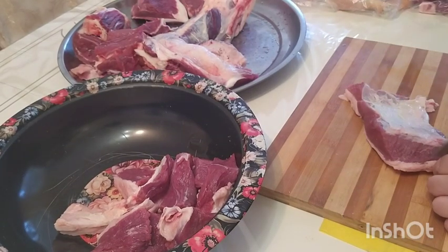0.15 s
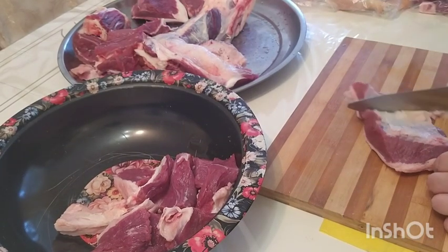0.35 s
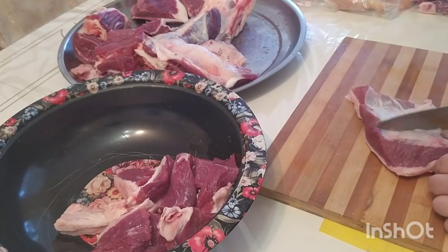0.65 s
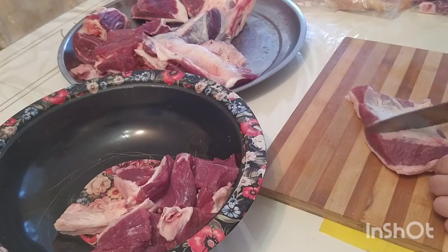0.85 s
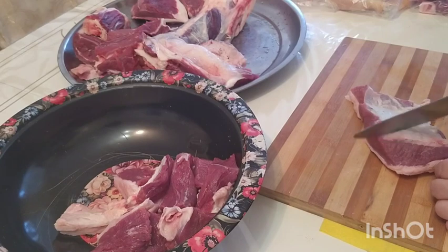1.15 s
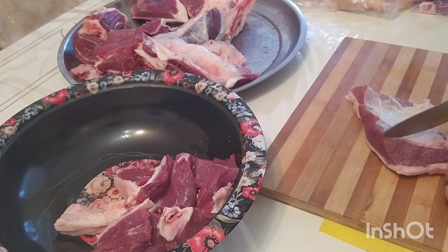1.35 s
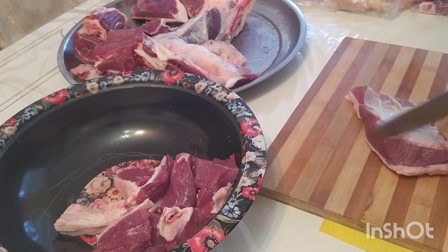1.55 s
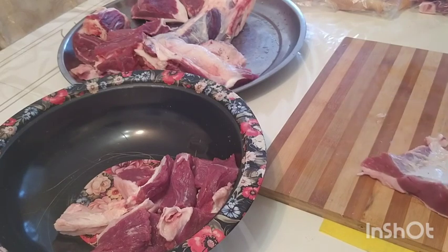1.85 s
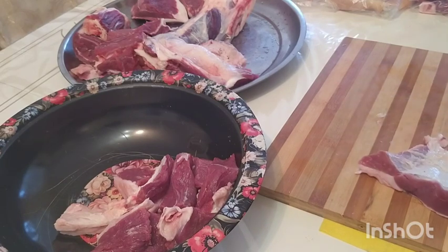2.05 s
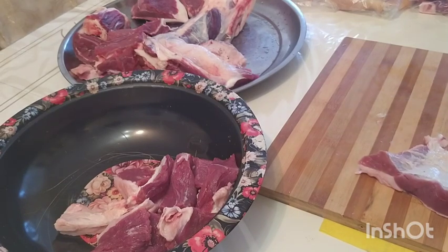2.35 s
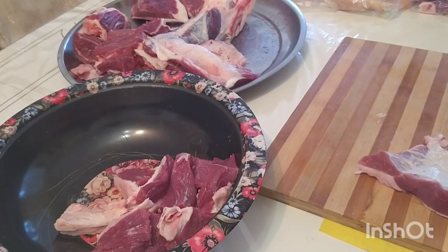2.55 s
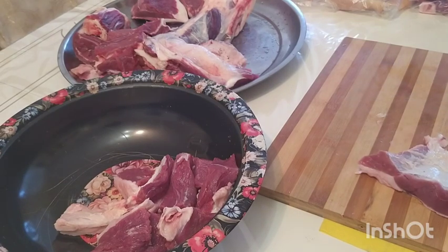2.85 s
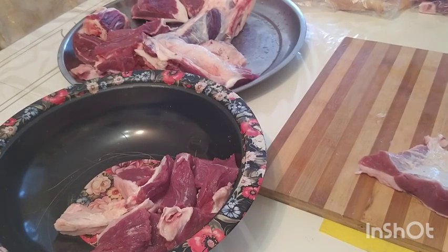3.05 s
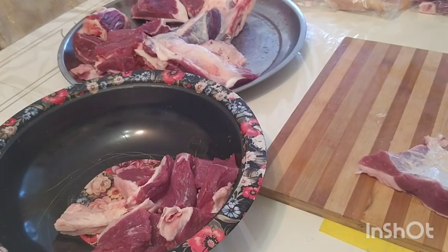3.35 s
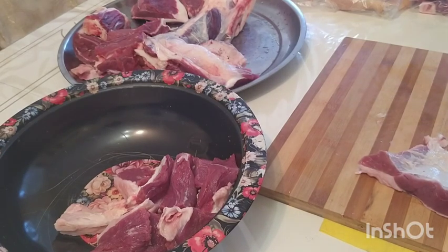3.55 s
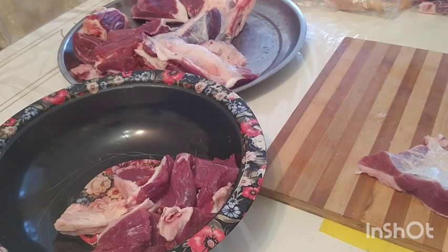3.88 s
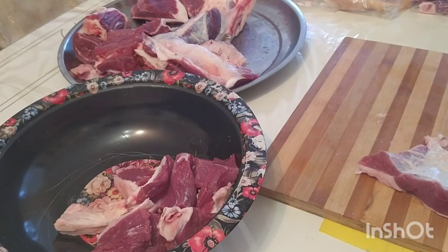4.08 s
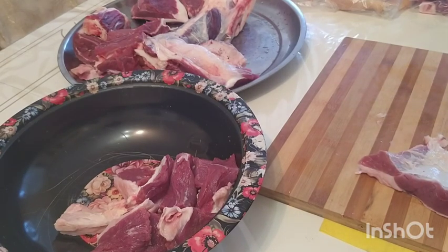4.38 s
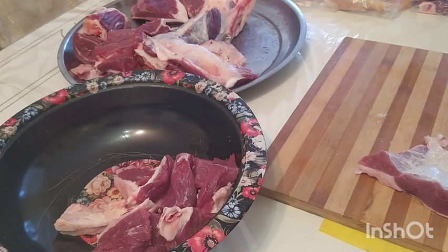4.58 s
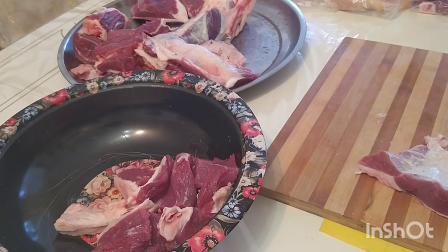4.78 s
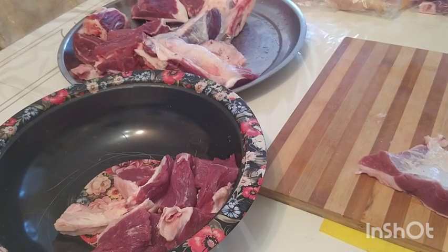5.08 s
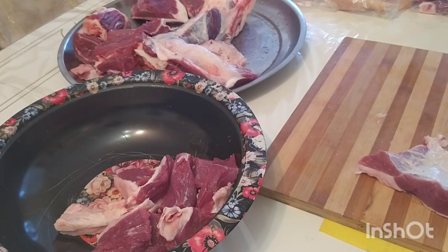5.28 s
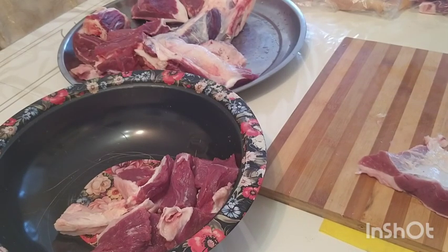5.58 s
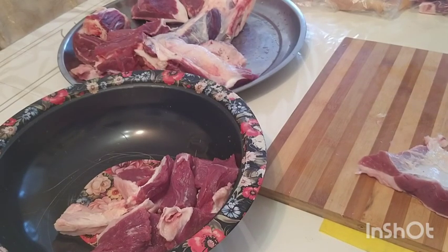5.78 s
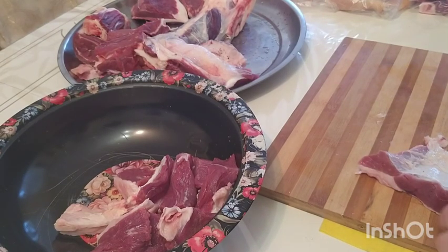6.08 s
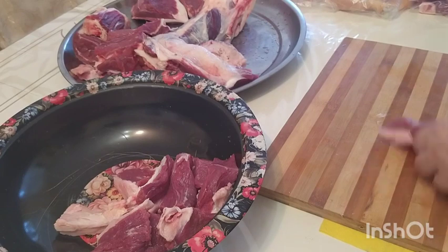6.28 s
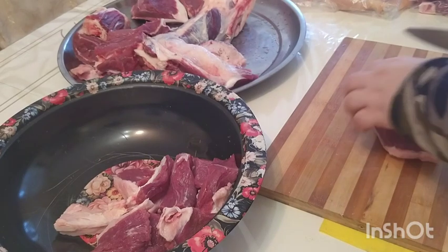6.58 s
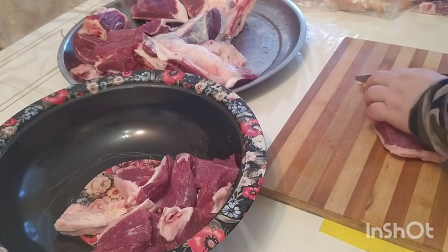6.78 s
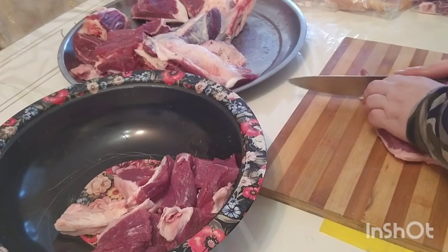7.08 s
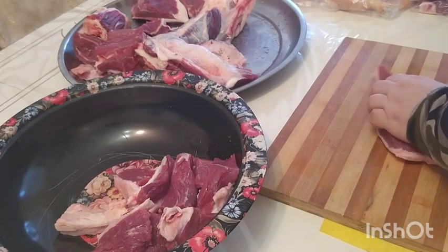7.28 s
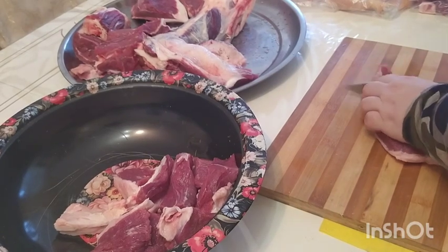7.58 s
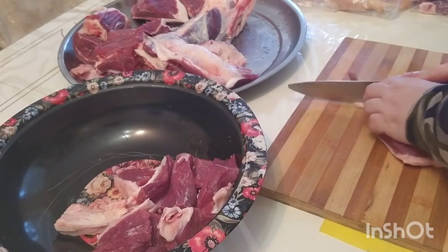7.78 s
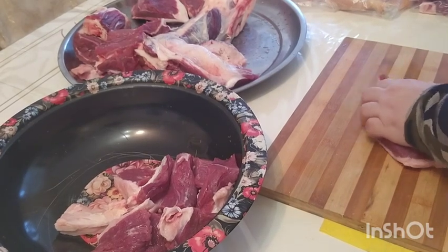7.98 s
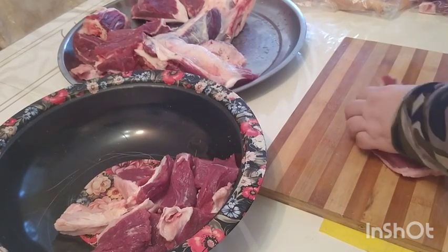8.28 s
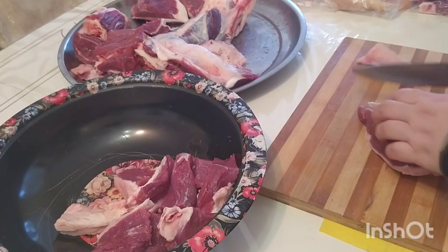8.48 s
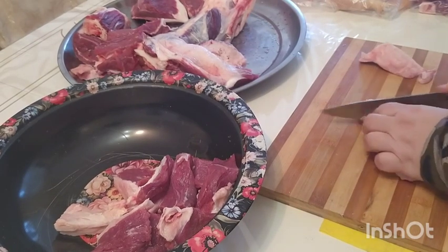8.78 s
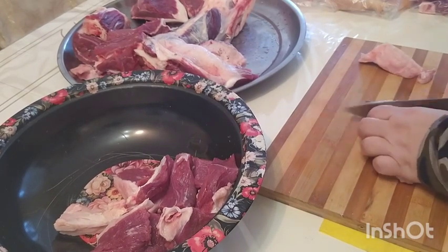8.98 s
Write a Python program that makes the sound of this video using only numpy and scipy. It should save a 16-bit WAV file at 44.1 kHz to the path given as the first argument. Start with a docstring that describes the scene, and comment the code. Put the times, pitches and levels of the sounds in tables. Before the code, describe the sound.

Quiet, wet knife strokes and dull knocks on a cutting board, broken once by a steel blade clattering on the counter.

```python
"""A kitchen knife slices raw meat on a wooden board in a small hard-walled kitchen.
Friction drives each stroke: wet fibres hiss and tear, the edge rasps, the board groans, the table thuds.
Fibres snap off the blade; meat and hand land on the board. Once the steel blade clatters hard on the
counter and the room rings after it. Room air and stand rumble lie beneath, at a two-port microphone."""
import sys
import numpy as np
from scipy import signal
from scipy.fft import rfft, irfft, next_fast_len
from scipy.io import wavfile
from scipy.ndimage import uniform_filter1d, map_coordinates

SR = 44100
rng = np.random.default_rng(int(sys.argv[2]) if len(sys.argv) > 2 else 0)


def wav_out(sig):
    """Save sig, one row per channel (or a flat mono array), as 16-bit PCM at SR to the path in sys.argv[1]."""
    wavfile.write(sys.argv[1], SR, np.round(np.clip(np.atleast_2d(sig).T, -1, 1) * 32767).astype(np.int16))


N = 403074

# Cuts and handling of the meat. Each row: full-strength time in seconds, rise in dB/s, hold in seconds,
# then levels in dB of wet hiss, fibre tear, edge rasp, board body and table.
KNIFE_STROKES = [(0.115, 720.0, 0, -51, -62.5, -75, -70, -71.5),
                 (0.382, 333, 0.009, -66, -79, -69.5, -55.5, -58.5),
                 (0.455, 612, 0.051, -62.5, -70, -78, -95.0, -79),
                 (0.729, 180.0, 0.011, -63.0, -69.5, -78, -76.5, -75.5),
                 (0.974, 380.0, 0.037, -69, -77, -85.5, -95.0, -76.0),
                 (1.049, 440.0, 0.0056, -71, -73, -75.0, -74, -73),
                 (1.154, 200.0, 0.089, -53.5, -64.5, -65.0, -77, -80),
                 (1.445, 210.0, 0.01, -59, -67, -65, -67.5, -67),
                 (1.575, 480.0, 0.025, -56.5, -63.5, -58.5, -63, -81),
                 (1.794, 220.0, 0.018, -52.5, -56, -59.0, -63.5, -66.5),
                 (1.94, 245, 0.021, -72, -76, -87, -64.5, -63),
                 (2.004, 380.0, 0.034, -55.5, -66, -59, -63.5, -64.5),
                 (2.101, 62, 0.11, -63.5, -72, -69.5, -70.5, -83),
                 (2.37, 140.0, 0.002, -68.5, -77.0, -79.0, -78, -79),
                 (2.566, 82, 0.036, -63.0, -69, -66, -66.5, -73),
                 (2.665, 1200.0, 0.025, -65.5, -70.5, -70, -59.0, -59),
                 (2.768, 220.0, 0.03, -57, -61, -56.5, -58, -57.5),
                 (2.864, 60.0, 0.071, -61.5, -71, -71.5, -80, -76),
                 (3.107, 440.0, 0, -56.5, -63.5, -70, -90, -95.0),
                 (3.23, 61, 0.022, -67.5, -82, -84, -73.5, -64.0),
                 (3.304, 1040.0, 0.036, -65, -70, -59.0, -67, -69),
                 (3.571, 60.0, 0.087, -58, -67.5, -61.0, -65, -66.5),
                 (3.781, 360.0, 0.02, -47, -56.0, -64, -65, -59),
                 (3.871, 57, 0.122, -68, -71, -66.5, -69, -91),
                 (3.894, 162, 0.004, -54, -73, -66.0, -93.0, -67),
                 (4.069, 242, 0.049, -53, -70.5, -67, -63.5, -63),
                 (4.248, 180.0, 0.018, -50, -58, -49, -53.5, -59),
                 (4.301, 55, 0.12, -52.5, -67.5, -64.5, -71, -64),
                 (4.559, 64.5, 0.0, -65, -71, -66.5, -67, -77.5),
                 (4.626, 240.0, 0.156, -61.0, -73.5, -70.5, -66, -73),
                 (4.805, 450.0, 0.013, -45.5, -61, -60.5, -67, -58),
                 (4.867, 680.0, 0.0027, -49, -65, -57, -71, -72),
                 (4.969, 430.0, 0.022, -53.5, -67, -60.5, -51, -44.5),
                 (5.051, 570.0, 0.0092, -87.5, -72.5, -71, -46, -74.5),
                 (5.088, 123.5, 0.038, -54, -75, -71.5, -93, -58),
                 (5.29, 70.0, 0.1, -99, -75.5, -78, -57.5, -63),
                 (5.355, 91, 0.061, -59.0, -69, -61.5, -67, -73.5),
                 (5.663, 891.5, 0.034, -67, -71.5, -65, -60.5, -64.5),
                 (5.77, 59, 0.11, -68, -74, -69, -64.5, -64),
                 (5.904, 362, 0.062, -59.5, -62, -59.5, -62.5, -65.5),
                 (6.154, 859.5, 0.034, -46.0, -52, -52.5, -45, -53.5),
                 (6.372, 60.0, 0.03, -56, -65.5, -64.5, -71.5, -76),
                 (6.552, 649.5, 0.023, -49, -53.5, -51.0, -51.5, -51),
                 (6.802, 442, 0.028, -56, -63, -61.5, -62.5, -73),
                 (6.982, 249.5, 0.06, -62, -73, -75.5, -87.0, -72),
                 (7.053, 293, 0.027, -57.5, -63.5, -59.5, -56, -55),
                 (7.183, 653, 0.041, -59.5, -65, -61.5, -66, -71),
                 (7.26, 541, 0.0039, -60.5, -59.5, -62.5, -57.0, -56),
                 (7.403, 349, 0.044, -51.5, -55.5, -55, -49.5, -55),
                 (7.587, 280.0, 0.05, -55.5, -60.5, -61.5, -54.5, -60),
                 (7.625, 2450.0, 0.033, -64, -92.5, -95, -65, -74.0),
                 (7.777, 290.0, 0.0055, -49, -52.5, -55.5, -46, -53),
                 (7.918, 1418, 0.0, -44, -68, -54.5, -50, -65),
                 (7.948, 340.0, 0.031, -57, -54.0, -52.5, -46.5, -62.0),
                 (8.112, 228, 0.044, -45.5, -49.5, -43.5, -38.0, -53),
                 (8.284, 290.0, 0.025, -49.5, -48.5, -45.5, -36, -61),
                 (8.45, 170.0, 0.0028, -62, -77, -71.5, -88.5, -71),
                 (8.886, 191, 0.034, -52.5, -62.5, -60.5, -59, -61.5),
                 (9.036, 270.0, 0.018, -52, -60, -58.0, -56, -57.5)]
# Friction spectra. Each row: frequency in Hz, relative density in dB.
WET_HISS_DB = [(4800, -27.5), (5600, -6.5), (7000, 2), (8500, 1.5), (10500, -0.5), (11500, -7.5),
               (13000, -18), (15000, -28), (15900, -40.5)]
FIBRE_TEAR_DB = [(3000, -31.5), (3500, -6), (4200, -1.5), (5600, -2.5), (6400, -30.5)]
EDGE_RASP_DB = [(1600, -20), (1900, 2.5), (2700, 4.5), (3500, -7.5), (4000, -54)]
BOARD_SKIN_DB = [(700, -29.5), (900, -4), (1300, 1.5), (1900, -6), (2400, -39)]
BOARD_GROAN_DB = [(220, -36.5), (300, -3.5), (400, 0), (550, 1), (900, 1.5), (1150, -44.5)]
TABLE_THUD_DB = [(35, -18), (60, -2.5), (150, -2), (300, 0), (400, -41.5)]
# Board resonances. Each row: frequency in Hz, width in Hz, gain in dB.
BOARD_MODES = [(483, 90, -9), (620, 76, -14), (960, 79, -8.5), (1056, 65, 0), (1170, 50, -1),
               (1654, 74, -0.5), (2120, 41, -9), (2420, 60, -12), (3000, 140, -7.5), (4200, 550, -9.5)]
# Sticky snaps. Each row: start in seconds, level in dB, pitch in Hz, left minus right in dB.
FIBRE_SNAPS = [(0.3215, -57, 10100, -9), (0.3869, -51, 8100, -6), (0.466, -58, 5230, 0.5),
               (0.51, -59, 4995, 0.5), (0.6891, -51, 7900, -8), (0.722, -57, 5206, -1.5),
               (0.9792, -55, 10540, 6), (0.997, -58, 10480, 4), (1.7245, -59, 5540, -1.5),
               (2.0014, -50, 9060, 1.5), (3.0969, -62, 8900, -2), (4.059, -42, 8660, 1),
               (4.803, -41, 9390, 11.5), (5.27, -55, 6800, 1.5), (5.8975, -52.5, 3830, -1.5),
               (6.5211, -56, 8170, 2.5), (6.5301, -49, 8830, 2.5), (6.797, -48.5, 9900, 4),
               (7.539, -41, 7840, 0), (7.58, -48, 10500, 0.5), (7.6289, -49, 7000, 2),
               (7.664, -53, 6360, -3), (7.7218, -49, 7950, -4), (7.7782, -44, 4620, 2),
               (7.8655, -50, 6890, -2.0), (7.8885, -50, 7535, -2), (7.9159, -37.5, 7780, -6.5),
               (8.0541, -49, 4430, -3), (8.4713, -63, 7650, -3)]
# Meat and hand landing, and at 3.304 s the blade's first touch on the counter before it clatters. # Each row:
# start in seconds, level in dB, pitch in Hz, T60 in seconds, board drive in dB above that level.
LANDINGS = [(2.662, -45.5, 179, 0.068, 38), (3.304, -61, 646, 0.054, 26), (4.242, -51, 428, 0.09, 33),
            (4.965, -30.5, 159.5, 0.077, 21.5), (5.654, -42, 362, 0.072, 17), (5.894, -46, 811, 0.061, 38),
            (6.143, -33, 690, 0.074, 37), (6.541, -39, 607, 0.054, 30), (6.561, -35, 133, 0.081, 23),
            (7.047, -43, 141, 0.19, 33.5), (7.395, -33.5, 301, 0.064, 36.5), (7.768, -34, 552, 0.055, 26),
            (7.922, -34, 373, 0.077, 43), (8.273, -27.5, 600, 0.094, 28)]
# Blade rattle envelope. Each row: time in seconds, relative level in dB.
RATTLE_ENVELOPE_DB = [(3.338, -36.5), (3.343, -18), (3.351, -11.5), (3.361, -21.5), (3.375, -18.5),
                      (3.386, -23), (3.400, -29), (3.43, -38.5), (3.46, -70.5)]
# Blade rattle spectrum. Each row: frequency in Hz, relative density in dB.
RATTLE_SPECTRUM_DB = [(60, -35), (350, -21), (690, -21.5), (860, -8), (1300, -5.5), (1550, -8.5),
                      (2300, -2.5), (3400, -11.5), (5500, -7.5), (9200, -9), (12300, -22.5), (13500, -41),
                      (15700, -45)]
# Steel resonances. Each row: frequency in Hz, relative level in dB, T60 in seconds.
BLADE_MODES = [(857, -9, 0.36), (1230, -7.5, 0.44), (1289, -12, 0.17), (2256, -6, 0.44), (2265, -9.5, 0.38),
               (2640, -7.5, 0.44), (2666, -4.5, 0.2), (3880, -10, 0.3), (4780, -12.5, 0.44),
               (5680, -5, 0.38), (6710, -10, 0.25), (6654, -10.5, 0.23), (8520, -7.5, 0.32),
               (9130, -5.5, 0.28)]
# Wall reverberation. Each row: frequency in Hz, T60 in seconds.
ROOM_T60_S = [(100, 0.36), (400, 0.42), (2000, 0.33), (6000, 0.33), (12000, 0.21)]
# Background spectra. Each row: frequency in Hz, relative density in dB.
ROOM_AIR_DB = [(35, -31.5), (60, 8), (103, -2.5), (415, 0), (477, -5.5), (742, -8), (1840, -15),
               (2550, -12), (3620, -19), (8570, -17), (10600, -19), (14600, -51.5), (15700, -48)]
STAND_RUMBLE_DB = [(5, -8), (15, 12.5), (35, -4.5), (60, -13.5), (100, -39)]
# Likeness of the ports. Each row: frequency in Hz, coherence from 0 to 1.
PORT_COHERENCE = [(25, 0.17), (60, 0.48), (150, .9), (300, 0.55), (700, 0.34), (2000, 0.34), (6000, 0.15),
                  (15000, 0.068)]
# Stereo balance. Each row: frequency in Hz, left minus right in dB.
SCENE_PAN_DB = [(60, -1.5), (150, -0.5), (380, -1.5), (950, -1), (2380, 0), (5980, -4), (15000, 7.5)]
RATTLE_PAN_DB = [(60, -6), (150, -1.5), (380, 4.5), (950, -3.5), (2380, 2), (5980, -6), (15000, 18)]

BRIGHT_FADE_DB_PER_S, DEEP_FADE_DB_PER_S = 175.5, 162
SKIN_RASP_SHARE, SKIN_OFFSET_DB = 0.65, -1.28
HARD_STROKE_DB, SKIN_BOOST_DB_PER_DB = -49, 0.61
SNAP_T60_S = .016
LEFT_LAG_S, TOP_HZ = .00023, 15750


def slicing():
    """One friction noise shakes fibres, edge, board and table, each with its own grain."""
    n_fft = next_fast_len(N)
    hz = np.fft.rfftfreq(n_fft, 1 / SR)
    friction = rfft(mottled_noise(np.ones_like, patchy_db=3.0), n_fft)
    wood = 0.77 + np.abs(resonances(BOARD_MODES, hz))
    # Each row: spectrum, resonant gain, grain depth in dB, grains per second.
    layers = [(WET_HISS_DB, 1, 1.7, 160), (FIBRE_TEAR_DB, wood, 1.8, 130),
              (EDGE_RASP_DB, wood, 1.6, 110), (BOARD_SKIN_DB, wood, 2.1, 80),
              (BOARD_GROAN_DB, wood, 2.2, 60), (TABLE_THUD_DB, 1, 2.5, 25)]
    out = 0
    for envelope, (spectrum_db, peaks, grain_db, grains_per_s) in zip(stroke_envelopes(), layers):
        shaken = irfft(friction * amp(curve(spectrum_db, hz)) * peaks, n_fft)[:, :N]
        grain = amp(grain_db * wobble(grains_per_s))
        out += envelope * unit_rms(shaken * grain)
    return out


def stroke_envelopes():
    """Gain per friction layer: strokes rise, hold and fade; overlaps add in power."""
    full_s, rise_db_per_s, hold_s, hiss_db, tear_db, rasp_db, board_db, table_db = (
        np.transpose(KNIFE_STROKES))
    # The board's skin lies between rasp and body; hard strokes boost it.
    skin_db = SKIN_RASP_SHARE * rasp_db + (1 - SKIN_RASP_SHARE) * board_db + SKIN_OFFSET_DB
    skin_db += SKIN_BOOST_DB_PER_DB * np.maximum(board_db - HARD_STROKE_DB, 0)
    t = np.arange(0, N / SR, .002)[:, None]
    attack_db = -rise_db_per_s * np.maximum(full_s - t, 0)
    fading_s = np.maximum(t - full_s - hold_s, 0)
    bright = amp(attack_db - BRIGHT_FADE_DB_PER_S * fading_s) ** 2
    deep = amp(attack_db - DEEP_FADE_DB_PER_S * fading_s) ** 2
    powers = [bright @ amp(db) ** 2 for db in (hiss_db, tear_db, rasp_db)]
    powers += [deep @ amp(db) ** 2 for db in (skin_db, board_db, table_db)]
    return [np.interp(np.arange(N) / SR, t[:, 0], np.sqrt(power)) for power in powers]


def fibre_snaps():
    """Fibres snap off the blade: short tones, widened in pitch by uneven tearing."""
    out, t = np.zeros((2, N + SR)), np.arange(SR // 16) / SR
    for start_s, db, hz, pan_db in FIBRE_SNAPS:
        flutter = 1.2 + 2.4 * uniform_filter1d(rng.standard_normal(len(t)), size=6)
        snap = flutter * np.sin(2 * np.pi * hz * t) * decay(t, SNAP_T60_S, attack_s=0.00034)
        out[:, round(start_s * SR):][:, :len(t)] += amp(db + np.array([[.5], [-.5]]) * pan_db) * snap
    return out[:, :N]


def soft_landings():
    """Meat and hand land, and the blade first touches the counter: a damped push of the table plus a short ring
    of the board."""
    push, blows, t = np.zeros(N + SR), np.zeros(N), np.arange(SR // 5) / SR
    for start_s, db, hz, t60_s, drive_db in LANDINGS:
        start = round(start_s * SR)
        push[start:][:len(t)] += amp(db) * np.sin(2 * np.pi * hz * t) * decay(t, t60_s, attack_s=0.0061)
        blows[start] = amp(db + drive_db)
    ring = filtered(blows, lambda hz: resonances(BOARD_MODES, hz) / (1 + 1j * hz / 900) ** 2)
    return push[:N] + ring


def blade_clatter():
    """Steel hits the counter: a dense rattle starts the blade ringing; the walls prolong the rattle."""
    time_s, db = np.transpose(RATTLE_ENVELOPE_DB)
    envelope = amp(np.interp(np.arange(N) / SR, time_s, db, left=-150, right=-150))
    burst = envelope * rng.standard_normal((2, N))
    rattle = filtered(burst, lambda hz: amp(12.5 + curve(RATTLE_SPECTRUM_DB, hz)))
    direct = at_ports(rattle, lambda hz: pan_gains(RATTLE_PAN_DB, hz))
    return blade_ring(time_s[0]) + direct + amp(1.5) * wall_reverb(rattle, RATTLE_PAN_DB)


def blade_ring(start_s):
    """The loose blade's modes swell, waver and die, damped by the counter as it settles flat."""
    out, t = np.zeros((2, N + SR)), np.arange(SR // 2) / SR
    hz, db, t60_s = np.transpose(BLADE_MODES)[..., None]
    envelope = amp(db - 13.5) * decay(t, t60_s, attack_s=0.0087)
    settle = 1 / (1 + (t / .24) ** 8)
    drift_rad = .028 * np.cumsum(rng.standard_normal((len(hz), len(t))), axis=1)
    for port, lag_rad in zip(out, (0, np.pi / 2)):  # the flexing blade faces each port differently
        waver_hz = rng.uniform(7.7, 40, hz.shape)
        waver_db = 2.9 * np.sin(2 * np.pi * (waver_hz * t + rng.random(hz.shape)))
        partials = envelope * amp(waver_db) * np.sin(2 * np.pi * hz * t + drift_rad - lag_rad)
        port[round(start_s * SR):][:len(t)] = settle * partials.sum(axis=0)
    return out[:, :N]


def wall_reverb(x, pan_db):
    """Hard walls return a noise tail; each frequency dies at its own rate."""
    hz, t, cells = signal.stft(rng.standard_normal((2, SR * 3 // 5)), SR, nperseg=256)
    fade = amp(-60 * t / curve(ROOM_T60_S, hz)[:, None])
    tail = signal.istft(cells * fade, SR, nperseg=256)[1]
    wet = signal.oaconvolve(x, tail / np.linalg.norm(tail[0]), axes=1)[:, :N]
    return at_ports(wet, lambda hz: pan_gains(pan_db, hz))


def room_tone():
    """Steady room air and a slow rumble through the microphone stand."""
    air = unit_rms(mottled_noise(lambda hz: amp(curve(ROOM_AIR_DB, hz)), patchy_db=1.5))
    rumble = unit_rms(at_ports(rng.standard_normal((2, N)), lambda hz: amp(curve(STAND_RUMBLE_DB, hz))))
    return amp(-69 + 1.1 * wobble(2.4)) * air + amp(-63 + 3.6 * wobble(3.2)) * rumble


def mottled_noise(response, patchy_db):
    """Stereo noise whose level varies in small patches of frequency and time."""
    shape = (513, N // 512 + 3)
    cells = rng.standard_normal((2, *shape)) + 1j * rng.standard_normal((2, *shape))
    patches = uniform_filter1d(rng.standard_normal(shape), size=3, axis=0)
    patches = unit_rms(uniform_filter1d(patches, size=4, axis=1))
    pair = signal.istft(cells * amp(patchy_db * patches), window="cosine", nperseg=1024)[1][:, :N]
    return at_ports(pair, lambda hz: response(hz) * pan_gains(SCENE_PAN_DB, hz))


def at_ports(pair, response):
    """Two unrelated signals become left and right: alike in the bass, the left slightly late."""
    n_fft = next_fast_len(N + SR // 8)
    hz = np.fft.rfftfreq(n_fft, 1 / SR)
    spread_rad = np.arccos(curve(PORT_COHERENCE, hz)) / 2
    mid, side = rfft(pair, n_fft) * [np.cos(spread_rad), np.sin(spread_rad)]
    delay = np.exp(-2j * np.pi * LEFT_LAG_S * hz)
    return irfft([(mid + side) * delay, mid - side] * response(hz), n_fft)[:, :N]


def pan_gains(pan_db, hz):
    """Left and right gains from a balance table."""
    return amp(np.outer([.5, -.5], curve(pan_db, hz)))


def resonances(modes, hz):
    """Causal response of summed resonances, alternating in sign."""
    return sum((-1) ** k * amp(db) * 1j * hz * width_hz / (mode_hz ** 2 - hz ** 2 + 1j * hz * width_hz)
               for k, (mode_hz, width_hz, db) in enumerate(modes))


def filtered(x, response):
    """Apply a complex frequency response."""
    n_fft = next_fast_len(N + SR // 8)
    hz = np.fft.rfftfreq(n_fft, 1 / SR)
    return irfft(rfft(x, n_fft) * response(hz), n_fft)[..., :N]


def decay(t, t60_s, attack_s):
    """Exponential fade with a rounded onset."""
    return amp(-60 * t / t60_s) * (1 - np.exp(-t / attack_s))


def wobble(knots_per_s):
    """Smooth random curve."""
    knots = rng.standard_normal(int(N * knots_per_s / SR) + 4)
    return map_coordinates(knots, [np.arange(N) * knots_per_s / SR])


def curve(points, hz):
    """Interpolate (Hz, value) points on a log frequency axis."""
    point_hz, values = np.transpose(points)
    return np.interp(np.log(hz + 1), np.log(point_hz + 1), values)


def amp(db):
    """Decibels to gain."""
    return 10 ** (np.asarray(db) / 20)


def unit_rms(x):
    """Scale to RMS 1."""
    return x / np.sqrt(np.mean(x ** 2) + 1e-20)


def scene():
    """All sources in stereo; snaps and landings share one wall reverb."""
    snaps, landings = fibre_snaps(), soft_landings()
    send = amp(-6.5) * snaps + amp(-4) * landings
    return slicing() + snaps + landings + wall_reverb(send, SCENE_PAN_DB) + blade_clatter() + room_tone()


def record(dry):
    """Input stage: soft clip, then band limit."""
    ceiling = .95
    rounded = dry / (1 + np.abs(dry / ceiling) ** 4) ** (1 / 4)
    return filtered(rounded, lambda hz: hz < TOP_HZ)


dry = scene()
out = record(dry)
wav_out(out)
```